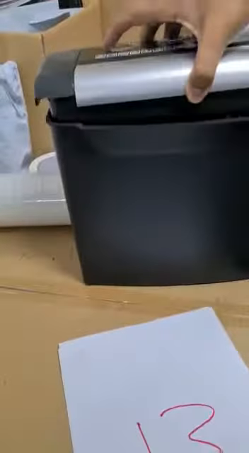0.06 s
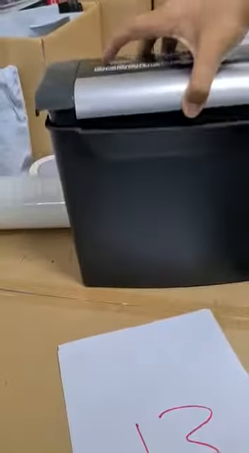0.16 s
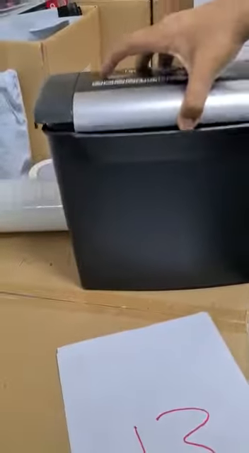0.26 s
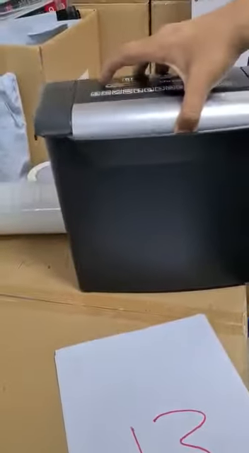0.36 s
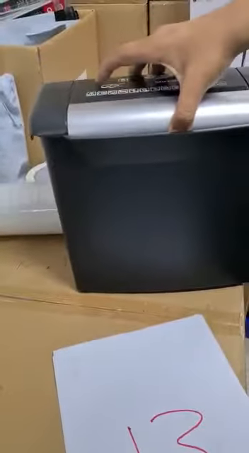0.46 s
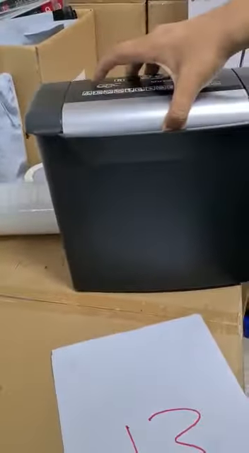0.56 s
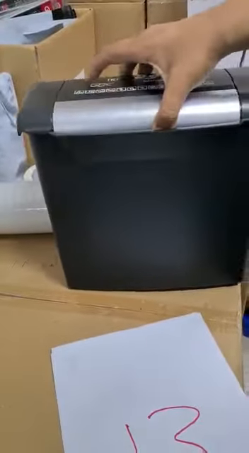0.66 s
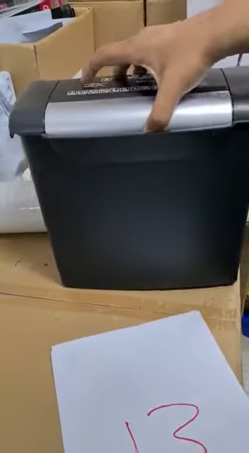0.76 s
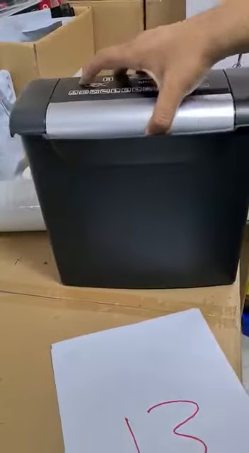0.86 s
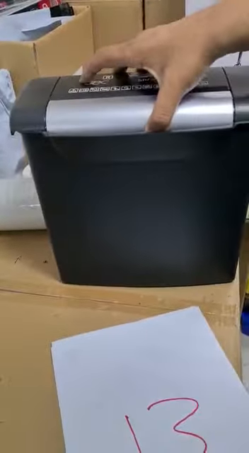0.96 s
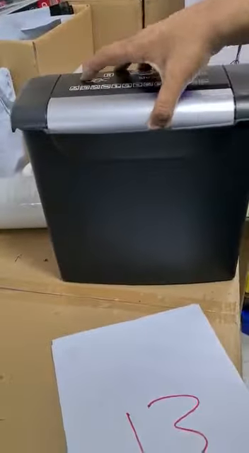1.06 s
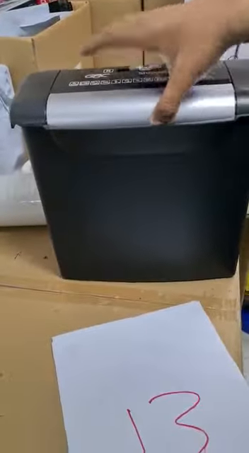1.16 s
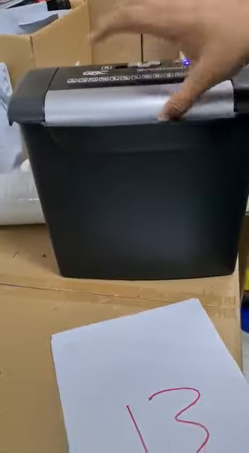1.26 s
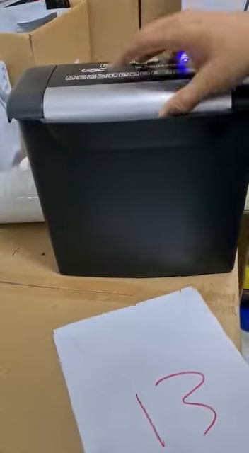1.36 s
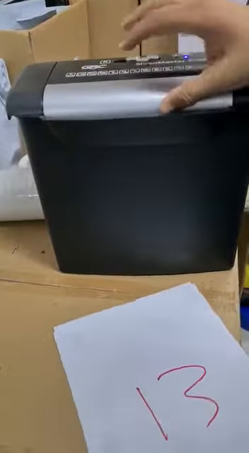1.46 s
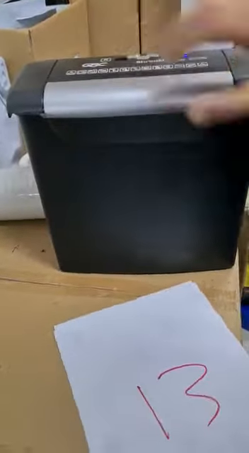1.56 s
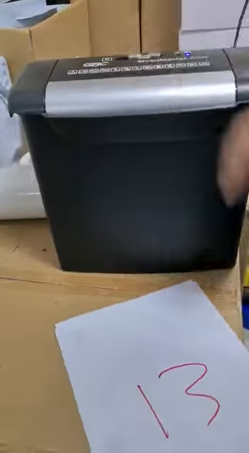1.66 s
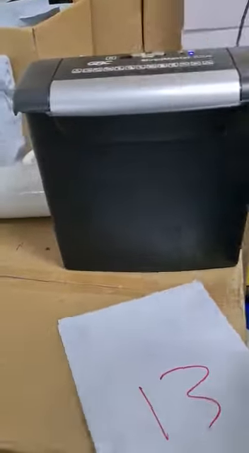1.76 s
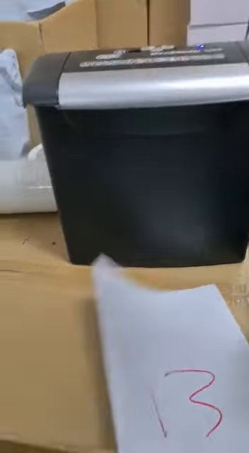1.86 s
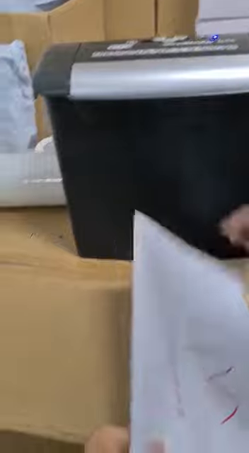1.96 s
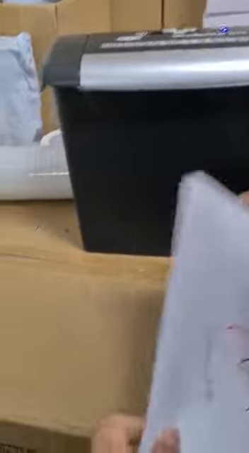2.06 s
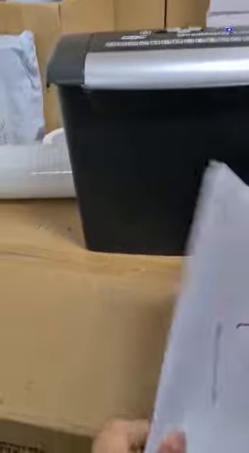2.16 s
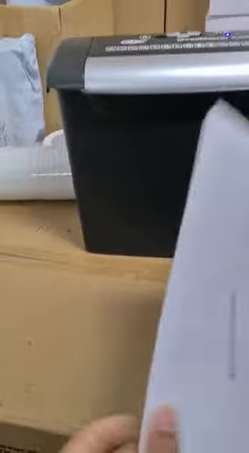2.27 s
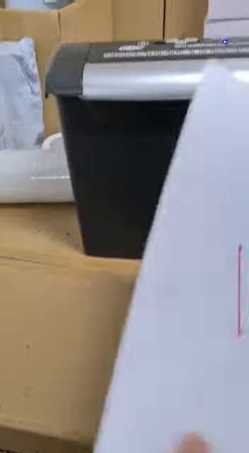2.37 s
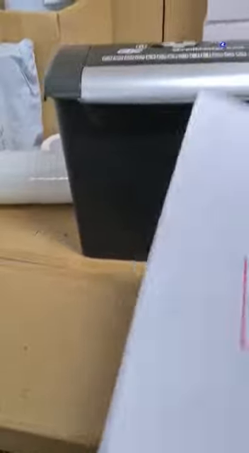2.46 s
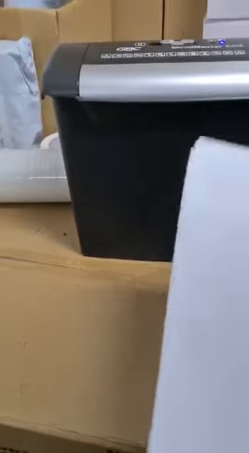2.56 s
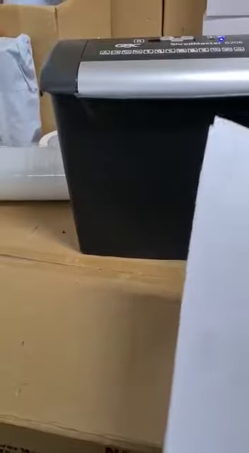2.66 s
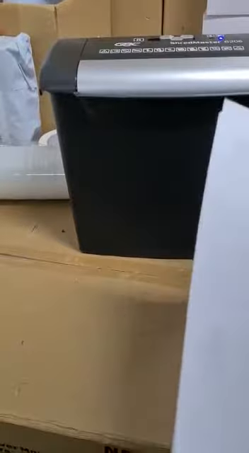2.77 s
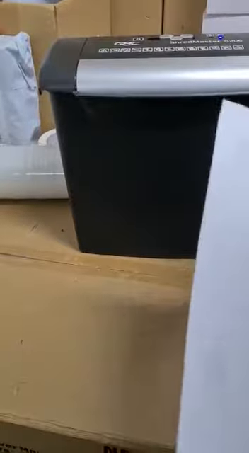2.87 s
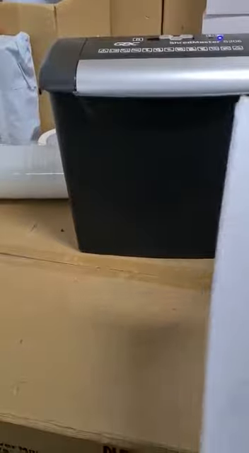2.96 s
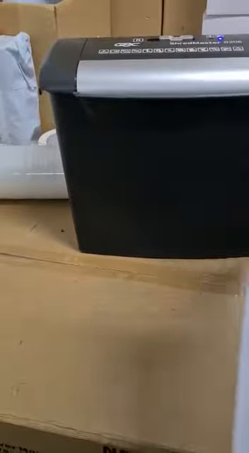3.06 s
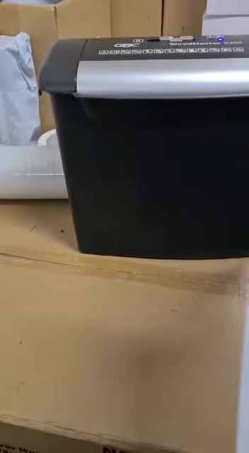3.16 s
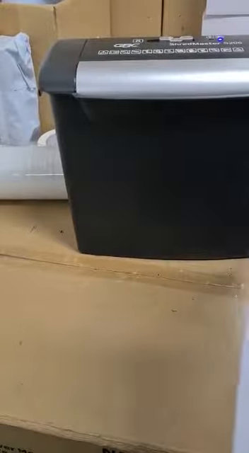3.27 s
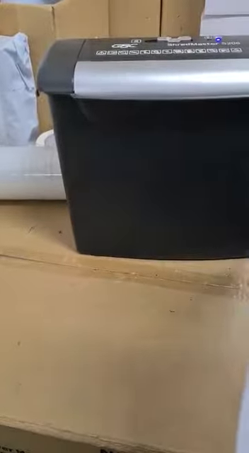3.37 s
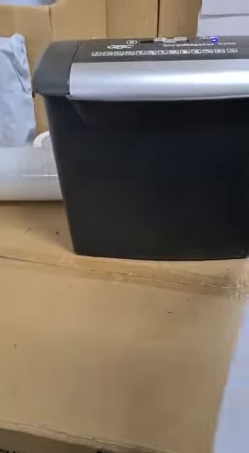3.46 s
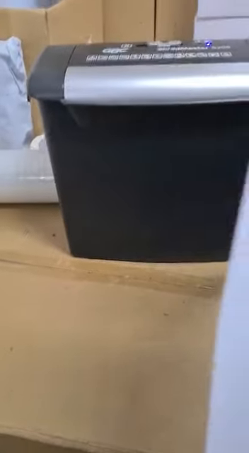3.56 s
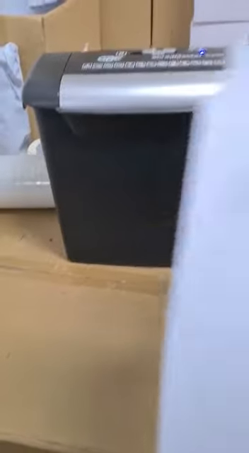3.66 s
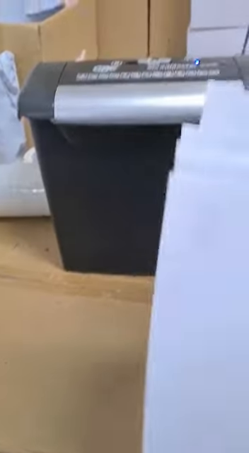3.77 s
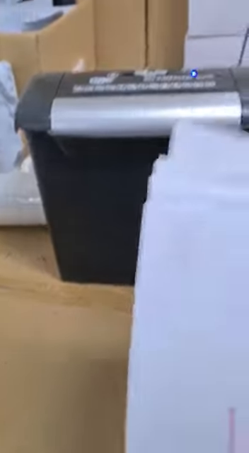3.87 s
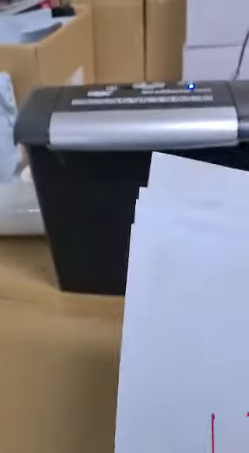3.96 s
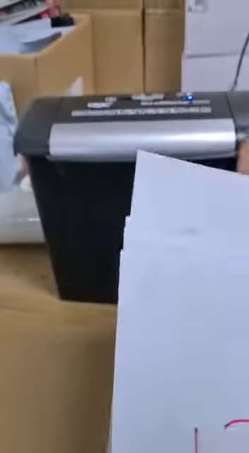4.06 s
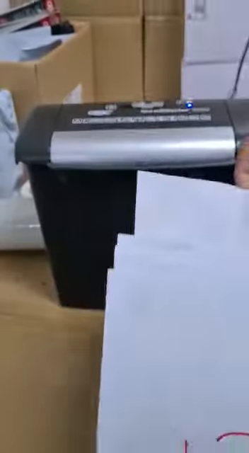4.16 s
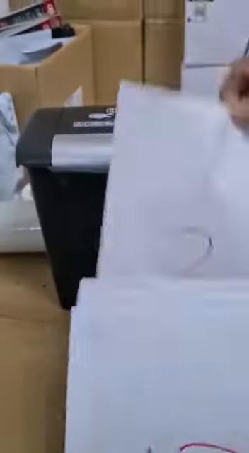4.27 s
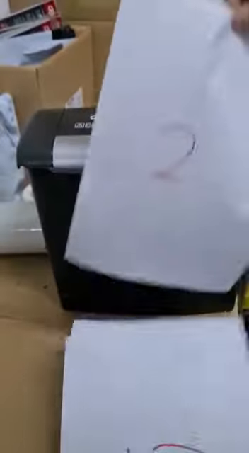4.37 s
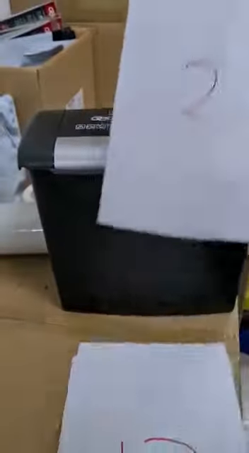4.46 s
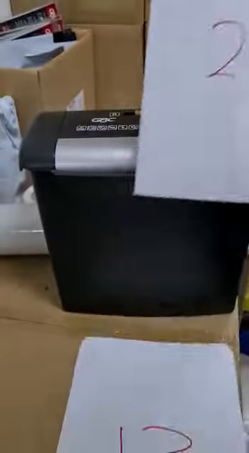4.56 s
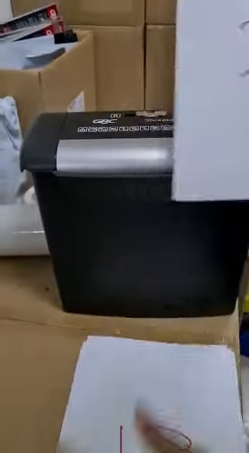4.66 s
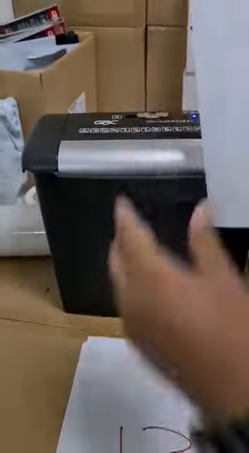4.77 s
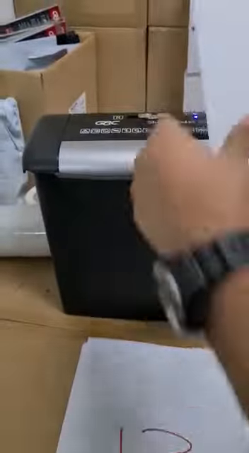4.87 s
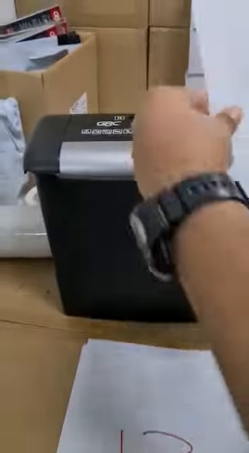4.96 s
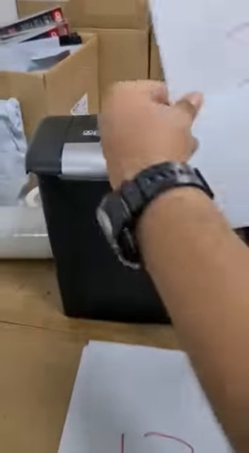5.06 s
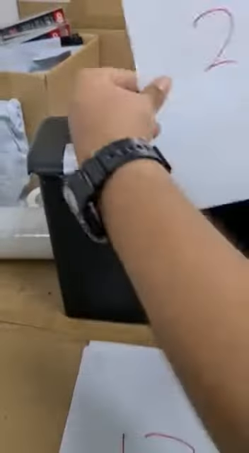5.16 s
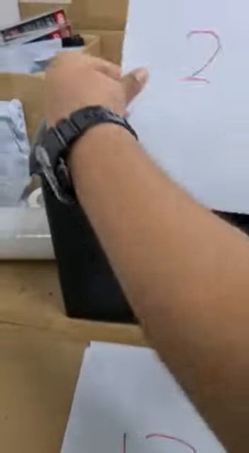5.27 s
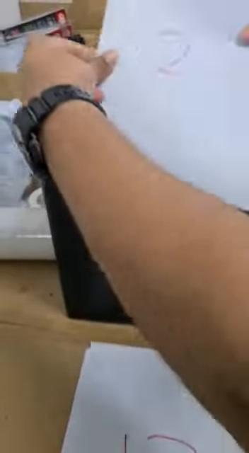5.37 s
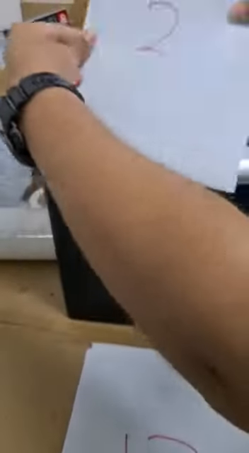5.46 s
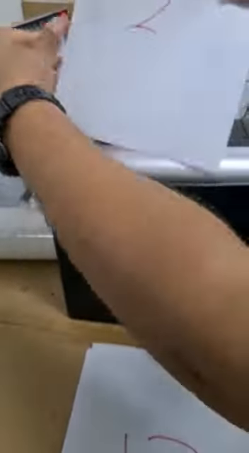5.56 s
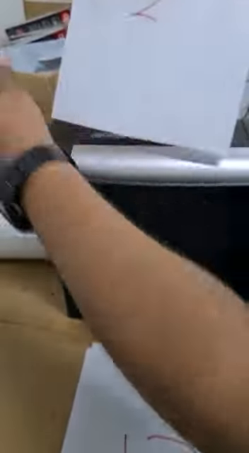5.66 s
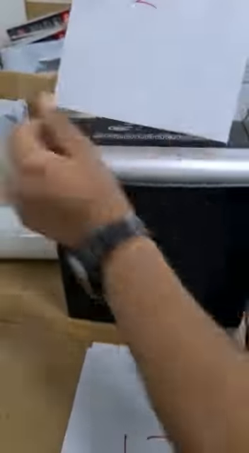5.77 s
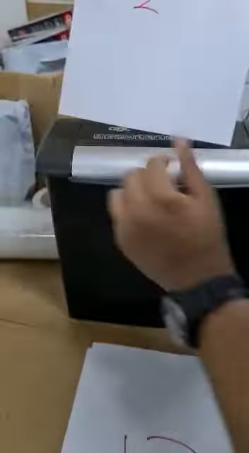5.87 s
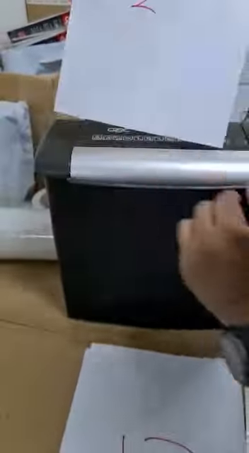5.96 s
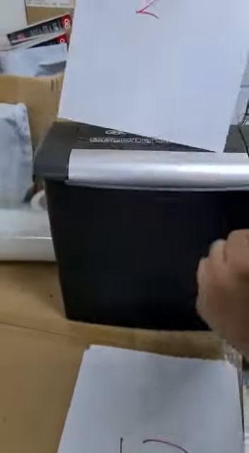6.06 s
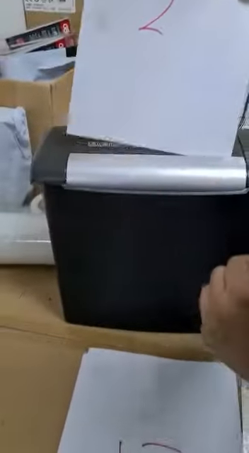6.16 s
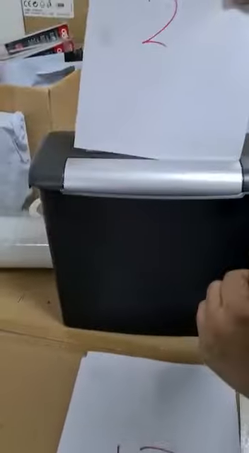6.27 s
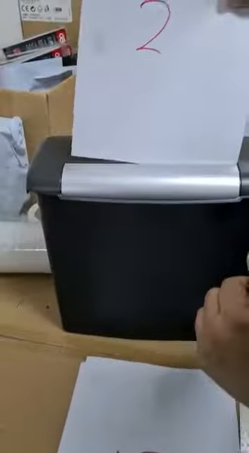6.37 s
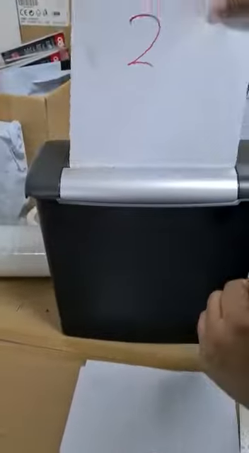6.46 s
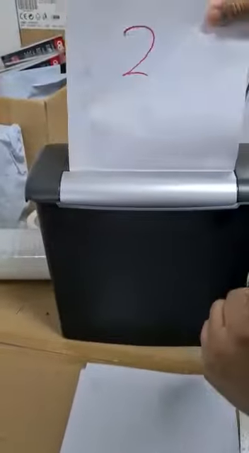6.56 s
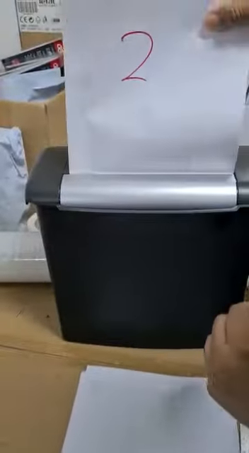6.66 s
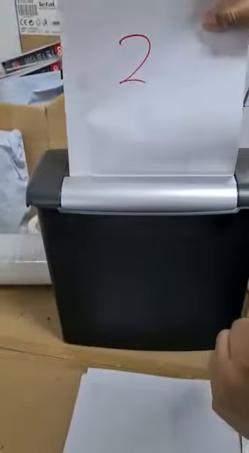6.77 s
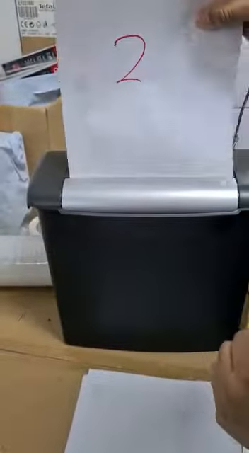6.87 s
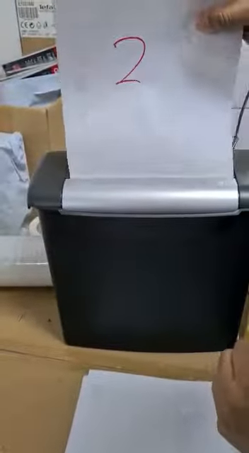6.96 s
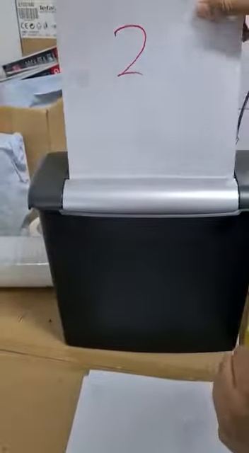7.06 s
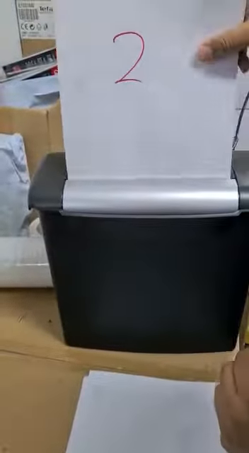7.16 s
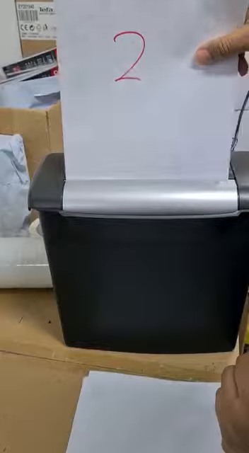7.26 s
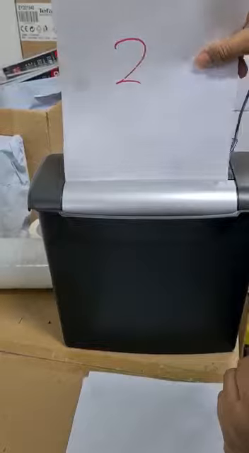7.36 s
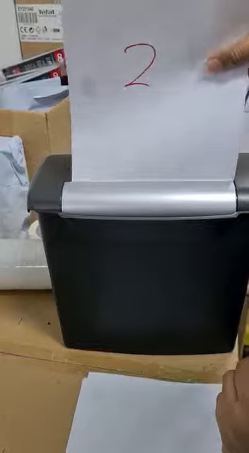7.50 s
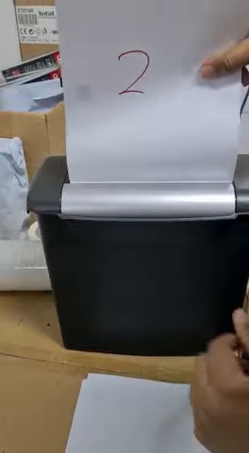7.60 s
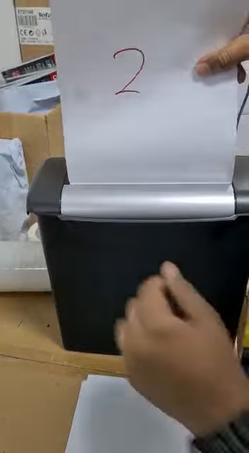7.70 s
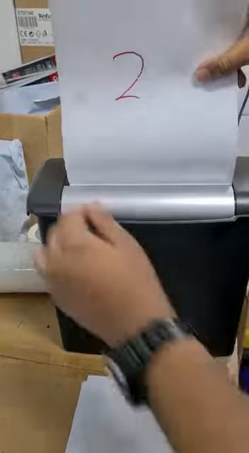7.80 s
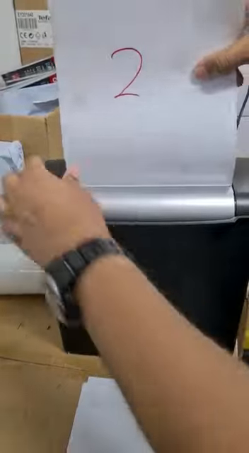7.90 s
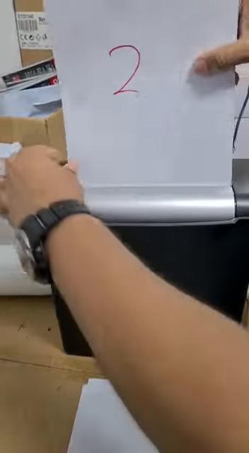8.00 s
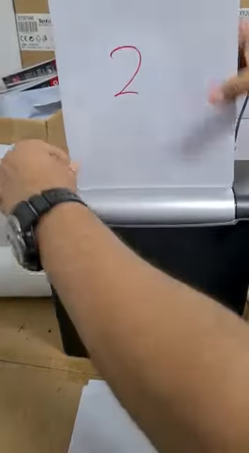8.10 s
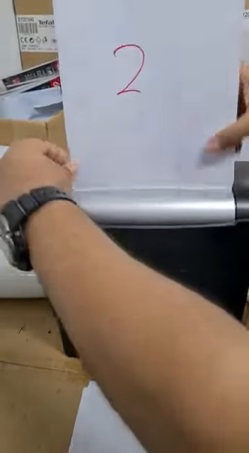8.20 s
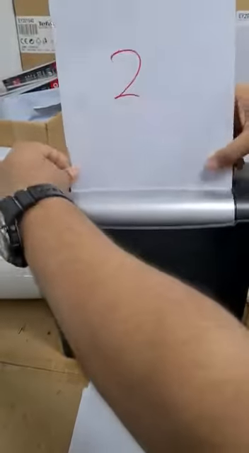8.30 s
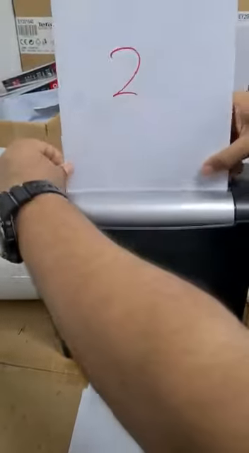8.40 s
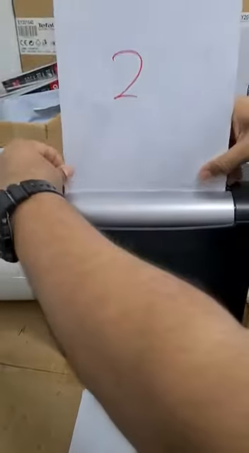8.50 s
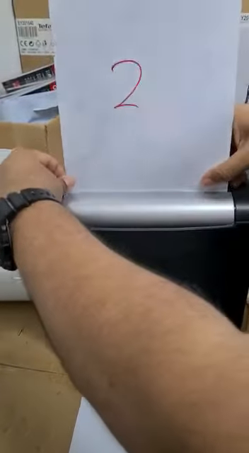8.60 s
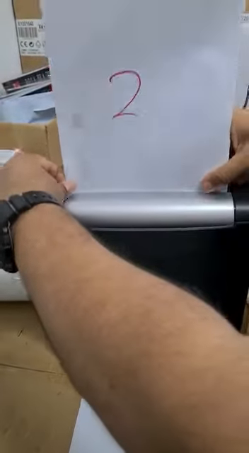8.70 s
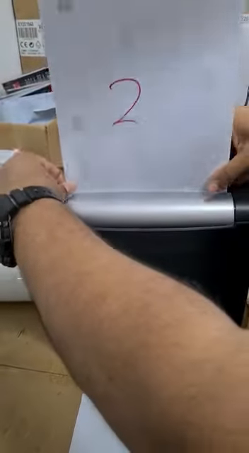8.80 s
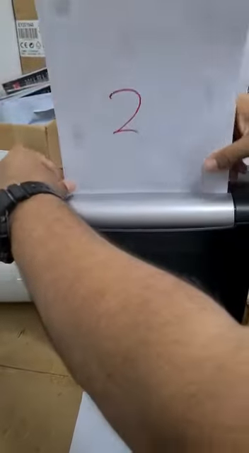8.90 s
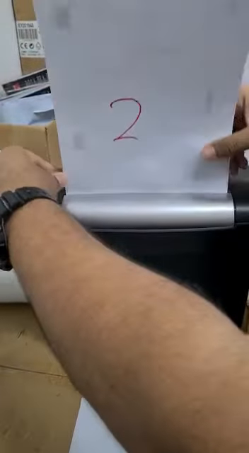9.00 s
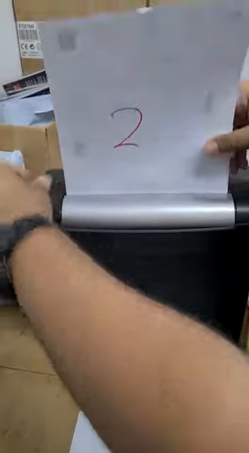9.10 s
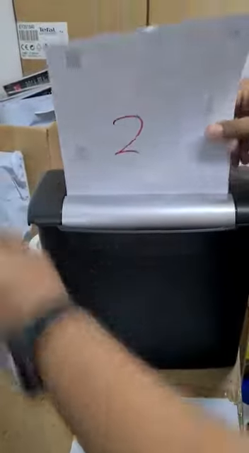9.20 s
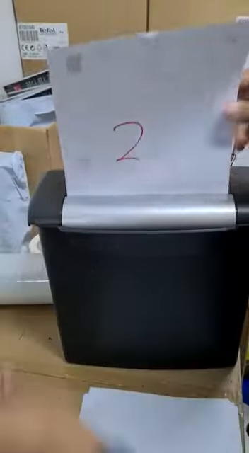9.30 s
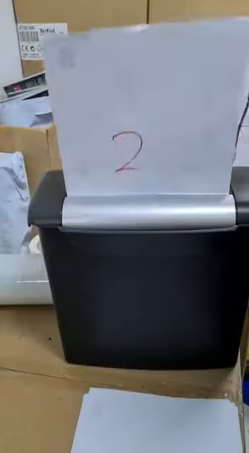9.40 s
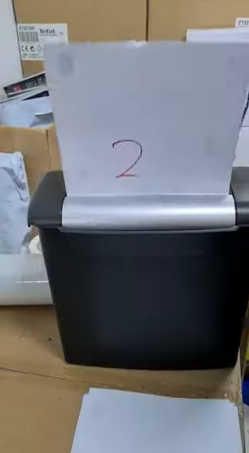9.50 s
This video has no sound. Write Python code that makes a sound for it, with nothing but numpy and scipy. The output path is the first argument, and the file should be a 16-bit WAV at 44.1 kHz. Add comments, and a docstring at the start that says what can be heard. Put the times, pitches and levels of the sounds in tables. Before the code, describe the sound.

Plastic knocks and rustling sheets of paper, then a paper shredder whirs in short bursts and starts cutting.

```python
"""A large quiet storeroom, rumbling low. A small shredder head is set down on its plastic bin, which rings
with each knock. Sheets are picked up, leafed and flexed: they hiss as they slide, rustle and snap as they
bend. One trips the sensor: the motor spins up, sags and restarts, its whine and gear buzz following the
shaft speed. At last the cutters bite, the hiss rises and the low tones throb under the load."""
import sys
import numpy as np
from scipy import signal
from scipy.fft import rfft, irfft
from scipy.io import wavfile

SR = 44100
rng = np.random.default_rng(int(sys.argv[2]) if len(sys.argv) > 2 else 0)


def wav_record(signal):
    """Record a signal, one row per channel, as 16-bit PCM in the file named by sys.argv[1]."""
    frames = np.transpose(np.atleast_2d(signal))
    bounded = np.clip(frames, -1, 1)
    # unit amplitude maps onto the largest positive 16-bit level
    quanta = np.round(bounded * 32767).astype(np.int16)
    wavfile.write(sys.argv[1], SR, quanta)


N = 420713
TIME_S = np.arange(N) / SR


def gain_of(db):
    return 10 ** (np.asarray(db) / 20)


def unit_rms(x):
    return x / np.sqrt(np.mean(x ** 2) + 1e-20)


def curve_at(points, hz):
    """A curve's value on a log-frequency axis."""
    freq_hz, value = np.transpose(points)
    return np.interp(np.log(hz + 1), np.log(freq_hz + 1), value)


def automation(points):
    return np.interp(TIME_S, *np.transpose(points))


def add(mix, start_s, sound):
    part = mix[:, round(start_s * SR):][:, :sound.shape[1]]
    part += sound[:, :part.shape[1]]


def waver(per_s):
    """Random drift, gliding to a new value per_s times a second."""
    steps = TIME_S * per_s
    count = int(steps[-1]) + 2
    return np.interp(steps, np.arange(count), rng.standard_normal(count))


def crackle(per_s, spread_db, t60_s):
    """An envelope of scattered little bursts of uneven size."""
    sizes = gain_of(spread_db * np.minimum(rng.exponential(1, N), 3))
    bursts = sizes * (rng.random(N) < per_s / SR)
    return unit_rms(signal.lfilter([1], [1, -gain_of(-60 / t60_s / SR)], bursts))


# How alike left and right sound: freq_hz, correlation
STEREO_LIKENESS = [(60, 0.97), (150, 0.98), (300, 0.83), (640, 0.54), (1300, 0.0036), (15000, 0.01)]
def stereo_noise(colour_db, size=N):
    """Coloured noise at two microphones: alike in the bass, unrelated in the treble."""
    hz = np.fft.rfftfreq(size, 1 / SR)
    left, other = rfft(rng.standard_normal((2, size)))
    likeness = curve_at(STEREO_LIKENESS, hz)
    right = likeness * left + np.sqrt(1 - likeness ** 2) * other
    return unit_rms(irfft(np.array([left, right]) * gain_of(colour_db(hz)), size))


# Room tone EQ: freq_hz, gain_db
ROOM_EQ = [(12, -39), (20, -5.5), (81, 2.5), (110, -8.5), (182, -6.5), (422, -20), (780, -19), (849, -19.5),
           (1220, -26.5), (1570, -26.5), (2140, -28.5), (16000, -101)]
def storeroom():
    """Distant machinery and air: a low rumble that swells, thinning out toward the treble."""
    return gain_of(-50.5 + 1.2 * waver(3)) * stereo_noise(lambda f: curve_at(ROOM_EQ, f))


# The bin's low body and its upper ring: pitch_hz, gain_db, t60_s
BIN_BODY = [(159.6, 2, 0.33), (198.2, 12, 0.15), (257, 3.5, 0.21), (295, -6, 0.42)]
BIN_RING = [(433, -6, 0.14), (578, 1, 0.028), (661, 0, 0.12), (798, -1, 0.096)]
# Knocks and motor jolts; a resting hand shortens the decay: start_s, level_db, ring_gain_db, decay_factor
BIN_KNOCKS = [(0.0, -30, -0.5, 0.7), (0.015, -26.5, -27, 1.3), (0.168, -37.5, -1, 0.38),
              (0.278, -41, -15, 0.4), (0.334, -29, -4, 0.33), (0.447, -40, -30, 0.56),
              (0.749, -39.5, 3, 0.7), (1.193, -29.5, -12, 0.27), (1.342, -43.5, 8, 0.45),
              (1.443, -42.5, 1, 0.57), (1.478, -39.5, 2.5, 0.36), (2.185, -31.5, -13, 0.2),
              (2.474, -37.5, 14, 1.2), (5.363, -33.5, 2, 0.3), (6.245, -48, -7, 0.81),
              (6.496, -34.5, 2, 1.5), (6.515, -34.5, 17, 0.87), (6.869, -30, -14, 0.69),
              (7.03, -29, 6, 0.61), (7.22, -30.5, 12, 0.51), (7.272, -27, 13, 0.33),
              (7.386, -34.5, 19, 0.39), (7.578, -27.5, 1, 0.69), (8.309, -26.5, -3.5, 0.37),
              (8.324, -33, 12, 1.27), (8.499, -27, 11.5, 0.57)]
def bin_knocks():
    """Each blow rings the plastic bin's modes, tuned a little differently every time."""
    out, t = np.zeros((2, N)), np.arange(SR // 3) / SR
    for start_s, level_db, ring_gain_db, decay_factor in BIN_KNOCKS:
        knock = 0
        for modes, part_db in ((BIN_BODY, level_db), (BIN_RING, level_db + ring_gain_db)):
            for hz, mode_db, t60_s in modes:
                detune, lag = rng.uniform(-1.43, 1, 2)
                phase = 2 * np.pi * hz * (1 + 0.0597 * detune) * t + [[0], [lag * hz / 700]]
                envelope = gain_of(part_db + mode_db - 9.5 - 60 * t / (t60_s * decay_factor))
                knock = knock + envelope * np.sin(phase)
        add(out, start_s, knock * np.minimum(t / 0.0022, 1))
    return out


def strokes(cues, attack_s, release_db_per_s, floor_db):
    """Envelope of hand movements: each rises quickly, drifts between two levels and dies away."""
    power = gain_of(2 * floor_db)
    for start_s, length_s, start_db, end_db in cues:
        t = TIME_S - start_s
        db = np.interp(t, [0, length_s], [start_db, end_db])
        db -= release_db_per_s * np.maximum(t - length_s, 0)
        power = power + gain_of(2 * db) * np.clip(t / attack_s + 1, 0, 1) ** 4
    return np.sqrt(power)


def paper_song(bands, drift, spread_db, per_s, width_hz=300):
    """A sheet sings in narrow bands of noise that wander in pitch and come and go."""
    out = 0
    for hz, db in bands:
        phase = 2 * np.pi * np.cumsum(hz * (1 + drift * waver(per_s / 3))) / SR
        band = [waver(width_hz) * np.sin(phase) + waver(width_hz) * np.cos(phase) for _ in range(2)]
        out = out + gain_of(db + spread_db * waver(per_s)) * np.array(band)
    return out


# Rustle EQ: freq_hz, gain_db
BEND_EQ = [(71, -46), (120, -13.5), (315, -9.5), (680, -13), (1100, -12), (1800, -15), (3000, -20.5),
           (6000, -37.5), (9000, -83)]
# Where a bending sheet sings: pitch_hz, gain_db
BEND_BANDS = [(650, -12), (1050, -11), (1500, -11), (1950, -13)]
# Bend cues: start_s, length_s, start_db, end_db
BEND_CUES = [(0.0, 0.0043, -68, -41), (0.69, 0.041, -60, -59), (2.075, 0.04, -55, -52),
             (2.135, 0.1, -43, -58), (2.40, 0.055, -62, -54), (2.47, 0.0083, -34, -35.5),
             (4.0, 0.088, -60, -46.5), (4.12, 0.032, -43, -40.5), (4.195, 0.019, -45, -36.5),
             (4.25, 0.022, -51, -41.5), (4.302, 0.09, -35.5, -43), (4.41, 0.042, -39, -43),
             (4.455, 0.037, -32.5, -37.5), (4.94, 0.036, -45, -36.5), (4.99, 0.042, -41.5, -38.5),
             (5.23, 0.12, -57.5, -39), (5.355, 0.021, -33, -35.5), (5.41, 0.083, -45, -42.5),
             (6.3, 0.27, -73, -40.5)]
def paper_bends():
    """A bending sheet buckles with a lumpy, crackling rustle."""
    envelope = strokes(BEND_CUES, attack_s=0.004, release_db_per_s=309, floor_db=-66)
    rustle = stereo_noise(lambda f: curve_at(BEND_EQ, f)) * (0.55 + 0.45 * crackle(240, 4, 0.018))
    buckle = paper_song(BEND_BANDS, drift=0.07, spread_db=4.5, per_s=45)
    return envelope * gain_of(1.15 * waver(55)) * (rustle + buckle)


# Paper snaps and small clicks: start_s, level_db, pitch_hz, edge_gain_db
SNAP_CUES = [(0.014, -34, 890, -16), (0.149, -46.5, 4900, -26), (1.659, -44.5, 1880, 1.5),
             (1.779, -35.5, 1810, -0.5), (2.0748, -33.5, 1150, -27), (2.139, -31.5, 680, -10.5),
             (2.139, -37, 1190, -19), (2.166, -40, 1900, -2.5), (2.186, -28, 714, -32),
             (2.192, -29, 700, -30), (2.411, -42.5, 530, -5), (2.474, -38, 676, -7),
             (2.489, -27.5, 554, -34), (2.607, -50, 3700, -20), (3.197, -55.5, 2950, 2),
             (4.124, -45, 1460, 10.5), (4.147, -41, 1100, -25), (4.154, -41, 1750, -25),
             (4.198, -25, 545, -32), (4.214, -31.5, 1650, -22), (4.27, -33, 1500, -20),
             (4.304, -32, 620, -8), (4.338, -32, 707, -30), (4.351, -29.5, 1440, -24),
             (4.369, -28.5, 1170, -32), (4.414, -35.5, 715, -23), (4.422, -37, 1900, -20),
             (4.455, -27, 1640, -22), (4.466, -30.5, 2030, -28), (4.492, -31.5, 2450, -16),
             (4.939, -52, 1100, 7), (4.961, -25.5, 1780, -27), (5.234, -50, 2000, 5.5),
             (5.287, -44, 1200, -17), (5.316, -46, 1220, -20), (5.361, -28, 990, -10.5),
             (5.375, -41, 610, -19), (5.443, -30, 1010, -22), (5.483, -36.5, 790, -20),
             (5.512, -35.5, 930, -23), (6.246, -31.5, 690, -27), (6.435, -46.5, 1890, 6),
             (7.227, -25, 1530, -15), (7.277, -30.5, 2080, 1), (7.414, -29.5, 1920, 0),
             (7.578, -23.5, 4180, -19), (8.504, -22, 736, -13.5)]
def paper_snaps():
    """Each snap is a short ring at one pitch, a puff of noise around it and a quick bright edge."""
    size = 4096
    out, t = np.zeros((2, N)), np.arange(size) / SR
    for start_s, level_db, hz, edge_db in SNAP_CUES:
        lag = rng.uniform(-0.7, 0.7) * min(hz / 600, np.pi)
        t60_s = np.clip(35 / hz, 0.012, 0.05)  # higher rings die sooner
        ring = np.sin(2 * np.pi * hz * t + [[0], [lag]]) * gain_of(-60 * t / t60_s)
        puff = stereo_noise(lambda f: -20 * np.log10(1 + (2.5 * (f / hz - hz / (f + 1))) ** 2), size)
        puff *= gain_of(7 - 60 * t / 0.03)
        edge = stereo_noise(lambda f: curve_at(SLIDE_EQ, f) - 0.31 * np.log2(1 + f / 4000), size)
        edge *= gain_of(edge_db + 6 - 60 * t / 0.012) + gain_of(edge_db - 0.5 - 60 * t / 0.061)
        edge *= np.minimum(t / 0.0016, 1)
        attack = np.sin(np.pi / 2 * np.minimum(t * hz / 2.4, 1)) ** 2  # builds over 2.4 cycles
        add(out, start_s, gain_of(level_db - 5.5) * ((ring + puff) * attack + edge))
    return out


# Paper hiss EQ, also the edge of a snap: freq_hz, gain_db
SLIDE_EQ = [(1180, -22), (2000, -9), (2440, -14), (2640, -10.5), (3610, -4.5), (4860, -5.5), (7190, -10.5),
            (11300, -8), (16000, -18)]
# Where a sliding sheet sings: pitch_hz, gain_db
SLIDE_BANDS = [(3650, -13), (4150, -14), (4950, -13)]
# Slide cues: start_s, length_s, start_db, end_db
SLIDE_CUES = [(0.142, .01, -59, -80), (0.33, 0.013, -64, -61), (0.58, 0.078, -80, -54),
              (0.70, 0.048, -57, -58.5), (1.265, 0.11, -56, -53), (1.40, 0.26, -60.5, -66),
              (1.65, .015, -56, -50), (1.75, 0.027, -53, -56), (1.82, 0.15, -56, -55.5),
              (2.125, 0.037, -56, -50), (2.20, 0.045, -50, -41.5), (2.31, 0.096, -67, -58),
              (2.415, 0.18, -49.5, -54), (2.645, 0.14, -61, -55), (2.875, 0.14, -50, -43),
              (3.01, 0.046, -63, -50.5), (3.17, 0.016, -61, -63), (3.27, 0.23, -44, -48.5),
              (3.48, 0.18, -60, -53), (3.62, 0.13, -53, -48.5), (3.82, 0.057, -48.5, -51.5),
              (3.96, 0.11, -46, -41), (4.12, 0.033, -43, -48), (4.20, 0.15, -47, -40),
              (4.42, 0.15, -43.5, -46.5), (4.59, .11, -52, -62.5), (4.93, 0.052, -56, -43),
              (5.12, 0.087, -60, -52), (5.23, 0.087, -51.5, -47.5), (5.355, 0.093, -50, -44),
              (6.12, 0.11, -61.5, -47.5), (6.37, 0.14, -60, -47.5)]
def paper_slides():
    """A sliding sheet gives a fine, grainy hiss with a rasp in it."""
    envelope = strokes(SLIDE_CUES, attack_s=0.02, release_db_per_s=302, floor_db=-73)
    hiss = stereo_noise(lambda f: curve_at(SLIDE_EQ, f))
    rasp = paper_song(SLIDE_BANDS, drift=0.04, spread_db=4, per_s=12)
    grain = 0.29 + 0.12 * crackle(77, 1, 0.05)
    return envelope * gain_of(0.84 * waver(50)) * (hiss + rasp) * grain


# The sensor switches the motor; a goal near zero is power off: start_s, goal_hz, time_constant_s
POWER_CUES = [(6.491, 231.5, 0.15), (7.023, 1, 0.32), (7.125, 235, 0.13), (7.275, -1, 0.32),
              (7.392, 231.5, .12), (8.005, 0, .25), (8.31, 200, .09), (8.39, 0, .22), (8.493, 239, 0.15),
              (8.766, 217, 0.14), (9.262, 224, 0.17)]
def shaft_speed():
    """The shaft glides toward each goal. Returns its speed and a 0-to-1 fade into coasting."""
    from_hz = 94.57
    shaft_hz, power_off = np.full(N, from_hz), np.zeros(N)
    ends_s = [cue[0] for cue in POWER_CUES[1:]] + [N / SR]
    for (start_s, goal_hz, lag_s), end_s in zip(POWER_CUES, ends_s):
        after = TIME_S >= start_s
        shaft_hz[after] = goal_hz + (from_hz - goal_hz) * np.exp(-(TIME_S[after] - start_s) / lag_s)
        power_off[after] = goal_hz < 20
        from_hz = goal_hz + (from_hz - goal_hz) * np.exp(-(end_s - start_s) / lag_s)
    pole = np.exp(-1 / (0.015 * SR))  # the power fades over about 15 ms
    return shaft_hz, signal.lfilter([1 - pole], [1, -pole], power_off)


# Peaks and dips of the housing: centre_hz, width_hz, gain_db
HOUSING_EQ = [(193, 95, -2.5), (685, 43, 13), (843, 61, 18), (1142, 200, 17), (1860, 1050, 17.5),
              (2456, 170, 12), (2560, 210, -7), (2985, 530, 13.5), (3880, 280, 11), (4480, 880, 17)]
def housing_db(hz):
    """The housing's resonances colour whatever passes through them."""
    return sum(db / (1 + (2 * (hz - centre) / width) ** 2) for centre, width, db in HOUSING_EQ)


def shaft_partials(partials, base_db, shaft_hz, turns, smear):
    """Tones at multiples of the shaft speed, coloured by the housing; higher ones are fuzzier."""
    out = 0
    for multiple, db in partials:
        level = gain_of(base_db + db + housing_db(multiple * shaft_hz) + 2.5 * waver(25))
        level *= (shaft_hz / 225) ** (0.3 * np.clip(multiple - 4, 0, 5))  # duller as the shaft slows
        # the paths to the two microphones differ
        lag = 0.73 * np.arccos(curve_at(STEREO_LIKENESS, multiple * 215)) + 0.46 * waver(9)
        fuzz = min(0.018 * multiple ** 1.8, 1) + 0.22 * np.clip(multiple - 14, 0, 15)
        phase = 2 * np.pi * (multiple * turns + rng.random()) + fuzz * smear * waver(120)
        out = out + level * np.array([np.sin(phase), np.sin(phase + lag)])
    return out


# Fader ride on the whine while cutting: time_s, gain_db
WHINE_RIDE = [(8.6, 0), (8.75, -6), (8.95, -5), (9.1, 6.5), (9.3, 0.5)]
def motor_whine(level_db, bite, shaft_hz, turns, smear):
    """A whine two octaves above the shaft tone, dipping and swelling under load."""
    base_db = level_db + bite * automation(WHINE_RIDE) - housing_db(4 * shaft_hz)
    return shaft_partials([(4, 3)], base_db, shaft_hz, turns, smear)


# Hum tones: pitch_hz, level_db
HUM_TONES = [(100, -53.5), (150, -51)]
def mains_hum():
    """The windings hum at harmonics of the mains, wavering in level and phase."""
    return sum(gain_of(db + 3.5 * waver(32)) * np.sin(2 * np.pi * hz * TIME_S + 0.45 * waver(20))
               for hz, db in HUM_TONES)


# Gear tones: shaft_multiple, gain_db
MESH_PARTIALS = [(.46, -1.5), (1.142, 8.5), (1.43, 0.5), (3.425, 5.5), (4.567, -8.5)]
def gear_mesh(level_db, shaft_hz, turns, smear):
    """Meshing teeth sing at fractional multiples of the shaft speed."""
    return shaft_partials(MESH_PARTIALS, level_db - housing_db(3.425 * shaft_hz), shaft_hz, turns, smear)


# Buzz harmonics: shaft_multiple, gain_db, load_change_db
BUZZ_PARTIALS = [(2, -19.5, 4.5), (3, -19, -1.5), (5, -32.5, -2), (6, -28.5, 2.5), (7, -23, -1),
                 (8, -23.5, -1.5), (9, -33.5, 6), (10, -23.5, -12), (11, -21.5, -7), (12, -22.5, -3.5),
                 (13, -27, -2), (14, -31.5, 1.5), (15, -30, 4), (18, -34.5, -0.5), (20, -29, -3),
                 (60, -19, 1)]
def shaft_buzz(level_db, bite, shaft_hz, turns, smear):
    """The shaft buzzes in whole harmonics whose balance shifts under load."""
    partials = [(multiple, db + load_db * bite) for multiple, db, load_db in BUZZ_PARTIALS]
    return shaft_partials(partials, level_db, shaft_hz, turns, smear)


# Grind EQ, ahead of the housing: freq_hz, gain_db
GRIND_EQ = [(35, -17), (60, -3.5), (156, -1.5), (257, 6), (360, -3), (581, -7.5), (681, -2.5), (994, -10),
            (2910, -12.5), (7000, -23.5), (9100, -94), (15400, -120)]
def gear_grind(level_db):
    """The gears rub with a gritty noise, heard through the housing."""
    grind = stereo_noise(lambda f: curve_at(GRIND_EQ, f) + 0.55 * housing_db(f))
    return gain_of(level_db - 2.5 + 2 * waver(40)) * grind * (0.97 + 0.3 * crackle(600, 3, 0.022))


# Brush and cutter EQ: freq_hz, gain_db
CUTTER_EQ = [(2940, -73), (5000, 0), (5380, -1), (7170, -4.5), (8460, 0), (11700, -2), (14800, -5.5),
             (16000, -17)]
def cutter_hiss(level_db):
    """Brushes and cutters add a bright, grainy hiss."""
    hiss = stereo_noise(lambda f: curve_at(CUTTER_EQ, f))
    return gain_of(level_db + 0.3 * waver(30)) * hiss * (0.83 + 0.2 * crackle(700, 2.2, 0.022))


# Motor mix by speed: shaft_hz, shaft_db, whine_db, mesh_db, grind_db, hiss_db
MOTOR_MIX = [(70, -56, -68, -62, -58, -62), (87, -54, -65, -60, -48, -57), (106, -50, -62, -60, -42.5, -55),
             (132, -44, -60, -60, -38, -53), (160, -39.5, -44, -55, -37, -48),
             (190, -36, -40, -56, -34, -46), (217, -37, -36, -58, -33.5, -46),
             (226, -44, -50, -50, -34.5, -45), (232, -45, -48, -43, -34.5, -46)]
# Trims for coasting and for cutting: shaft_db, whine_db, mesh_db, grind_db, hiss_db
COAST_TRIMS = [-2, -1.5, 5, 0.5, -0.5]
CUT_TRIMS = [6, -1.5, 13.5, 0.5, 4]
BITE_S, BITE_RISE_S = 8.58, 0.097  # the cutters take the sheet
THROB_HZ, THROB_DIP_S, THROB_DEPTH = 6.14, 9.265, 0.57  # under load, shaft tone and whine sink on a beat
def motor():
    """Tones locked to the shaft, with grind and hiss pulsing each turn; speed and load set the mix."""
    shaft_hz, coasting = shaft_speed()
    bite = np.clip((TIME_S - BITE_S) / BITE_RISE_S, 0, 1)
    speeds_hz, *faders = np.transpose(MOTOR_MIX)
    shaft_db, whine_db, mesh_db, grind_db, hiss_db = [
        np.interp(shaft_hz, speeds_hz, db) + coast_db * coasting + cut_db * bite
        for db, coast_db, cut_db in zip(faders, COAST_TRIMS, CUT_TRIMS)]
    turns = np.cumsum(shaft_hz * (1 + 0.00274 * waver(60))) / SR
    smear = 0.8 - 0.1 * bite  # the tones tighten a little while cutting
    shaft = gain_of(shaft_db + 2.5 + 3 * waver(30)) * np.sin(2 * np.pi * turns + 0.55 * waver(45))
    whine = motor_whine(whine_db, bite, shaft_hz, turns, smear)
    throb = 1 - THROB_DEPTH * bite * np.cos(np.pi * THROB_HZ * (TIME_S - THROB_DIP_S)) ** 4
    hum = mains_hum() * (1 - coasting)
    mesh = gear_mesh(mesh_db, shaft_hz, turns, smear)
    buzz = shaft_buzz(grind_db - 2.17 - 10 * coasting, bite, shaft_hz, turns, smear)
    rub = (gear_grind(grind_db) + cutter_hiss(hiss_db)) * (1 + 0.031 * np.cos(2 * np.pi * turns))
    fade_in = np.clip((TIME_S - POWER_CUES[0][0]) / 0.048, 0, 1)
    return ((shaft + whine) * throb + hum + mesh + buzz + rub) * fade_in


def room_reverb(sound, t60_s=0.22, predelay_s=0.004):
    """Boxes and far walls return a short diffuse tail, different for each ear."""
    t = np.arange(SR // 2) / SR
    tail = rng.standard_normal((2, len(t))) * gain_of(-60 * t / t60_s) * (t > predelay_s)
    return signal.fftconvolve(sound, tail / np.linalg.norm(tail[0]), axes=1)[:, :N]


# Pan of the hands at work: time_s, right_minus_left_db
HANDLING_PAN = [(0, 0.5), (2.2, 1), (3.3, 1), (4.2, 0.5), (5.2, -3), (5.8, -1)]
def scene():
    """Panned handling and the motor over the room tone; only knocks and snaps feed the reverb."""
    pan_db = automation(HANDLING_PAN)
    hits = bin_knocks() + paper_snaps()
    handling = (hits + paper_bends() + paper_slides()) * gain_of([-pan_db / 2, pan_db / 2])
    return storeroom() + handling + gain_of(-5.5) * room_reverb(hits) + motor()


# Microphone balance: freq_hz, left_minus_right_db
MIC_BALANCE = [(60, -1), (180, -3), (550, -1), (1650, 0.0), (4970, -1.5), (15000, -1.5)]
def record(dry, cutoff_hz=15850):
    """The right microphone is a little more sensitive; a steep low-pass trims the very top."""
    lean_db = curve_at(MIC_BALANCE, np.fft.rfftfreq(N, 1 / SR)) / 2
    leaning = irfft(rfft(dry) * gain_of([lean_db, -lean_db]), N)
    lowpass = signal.firwin(511, cutoff_hz, window=("kaiser", 9), fs=SR)
    return signal.oaconvolve(leaning, lowpass[None], "same")


dry = scene()
out = record(dry)
wav_record(out)
```